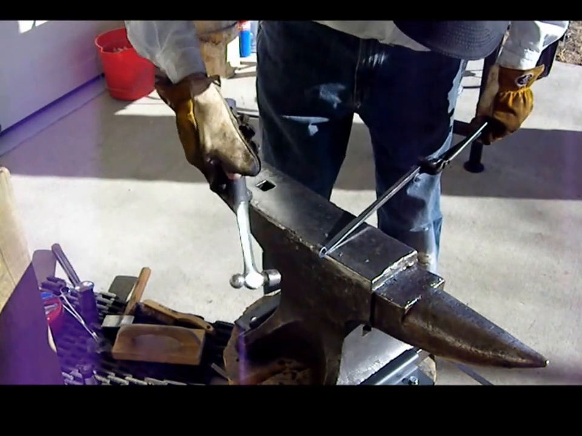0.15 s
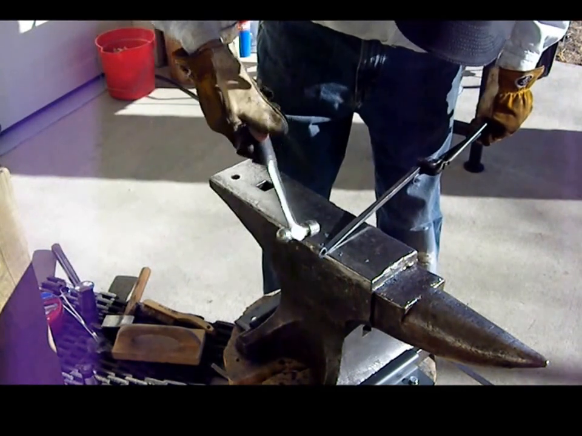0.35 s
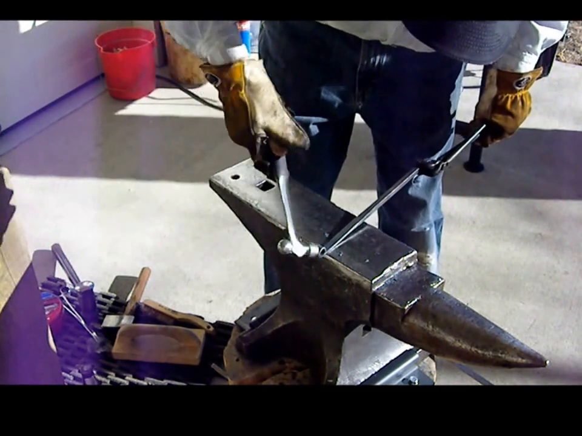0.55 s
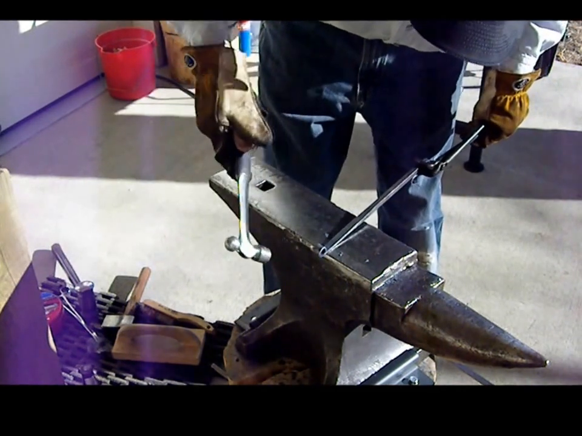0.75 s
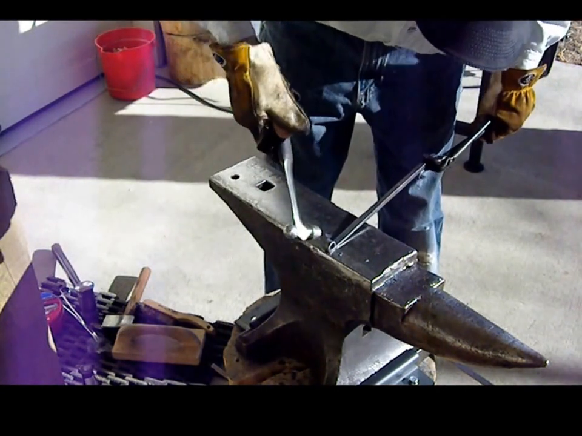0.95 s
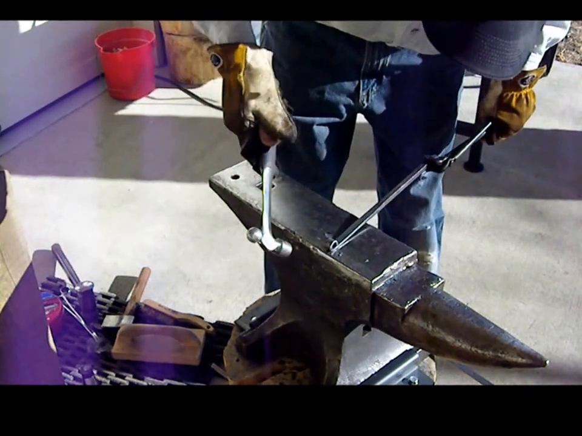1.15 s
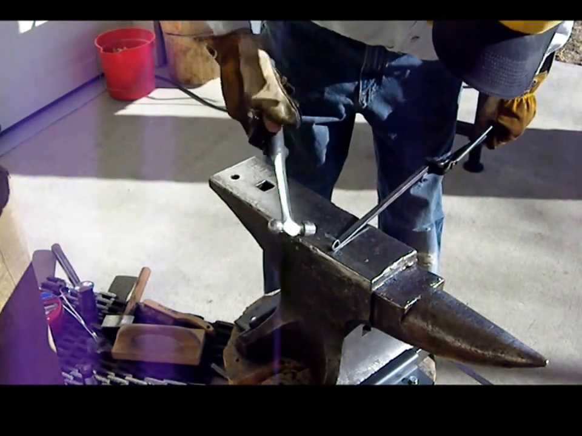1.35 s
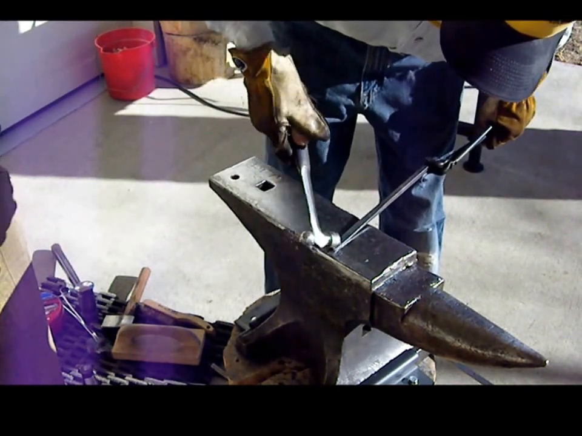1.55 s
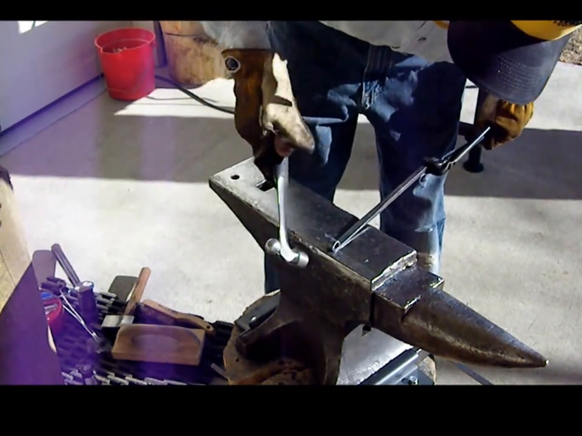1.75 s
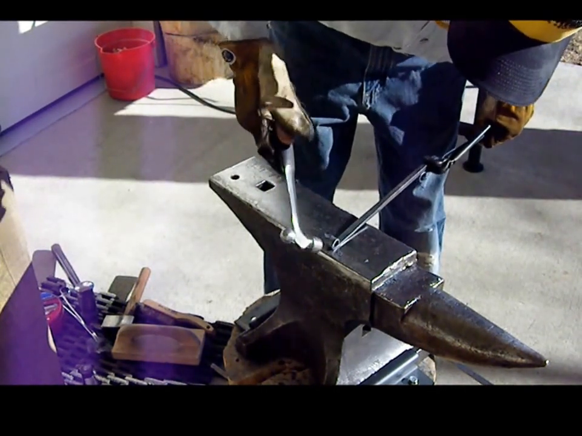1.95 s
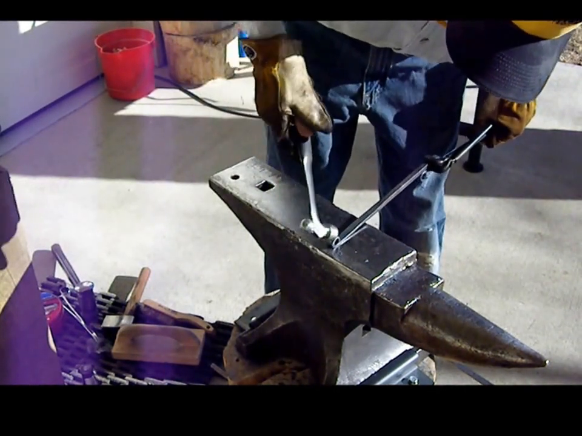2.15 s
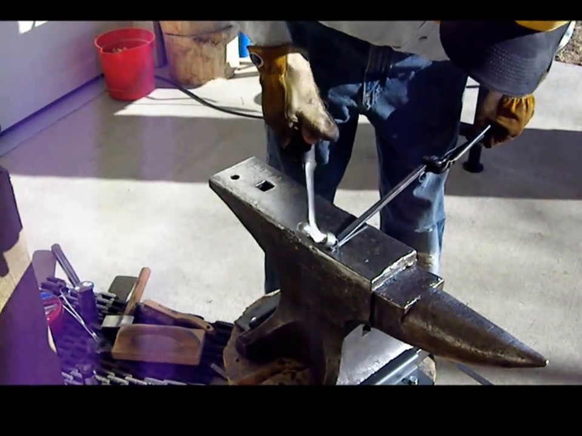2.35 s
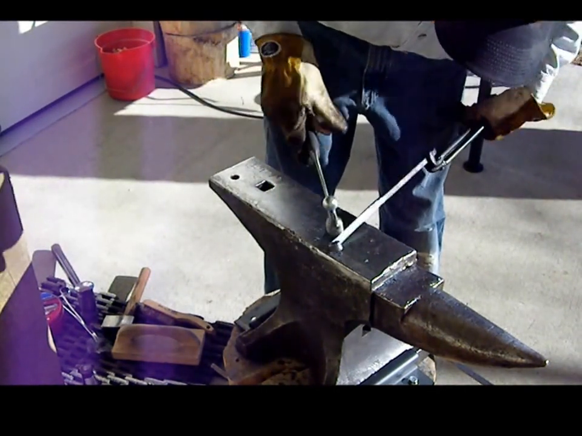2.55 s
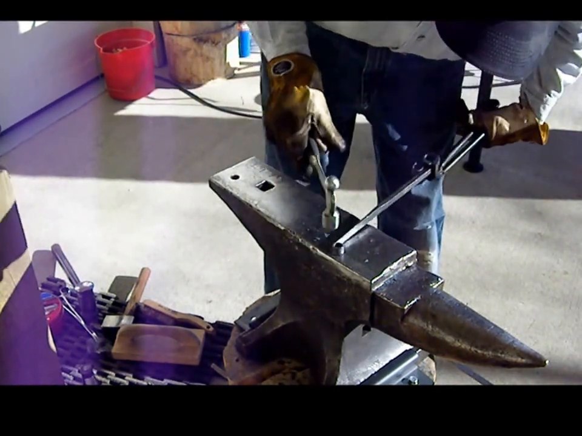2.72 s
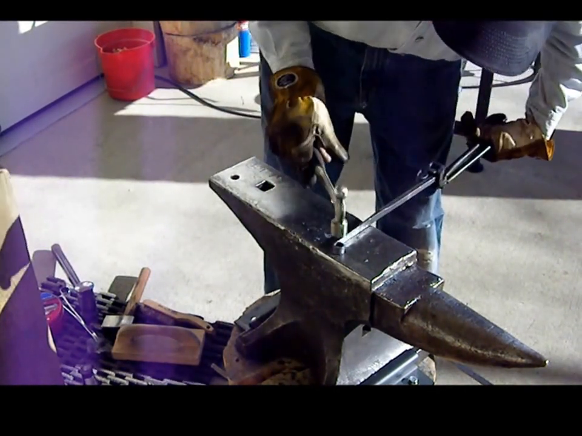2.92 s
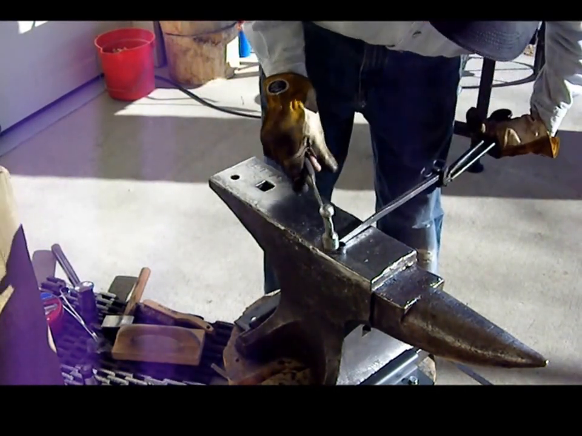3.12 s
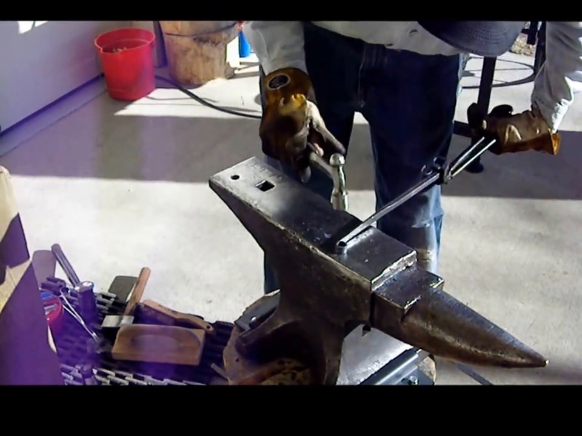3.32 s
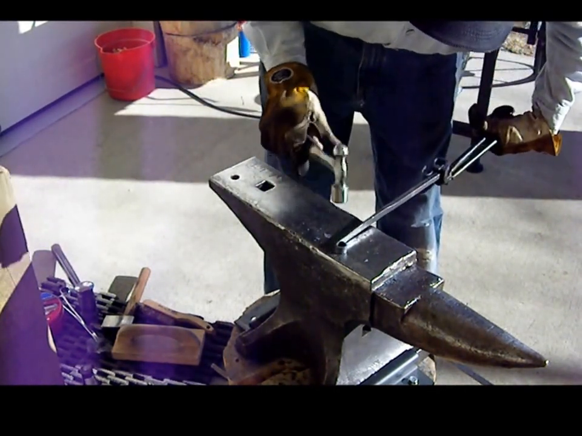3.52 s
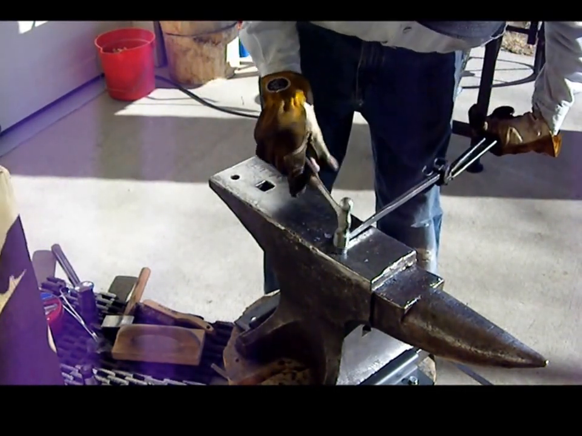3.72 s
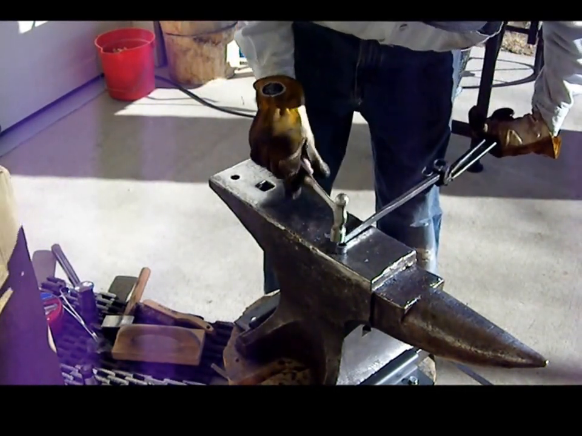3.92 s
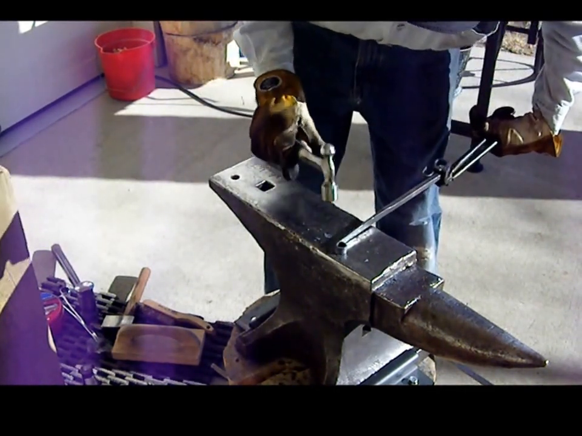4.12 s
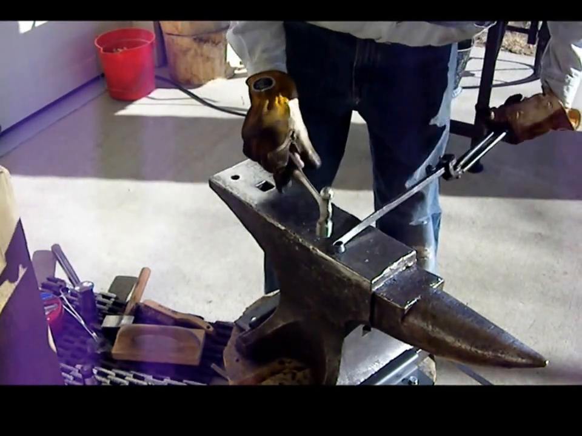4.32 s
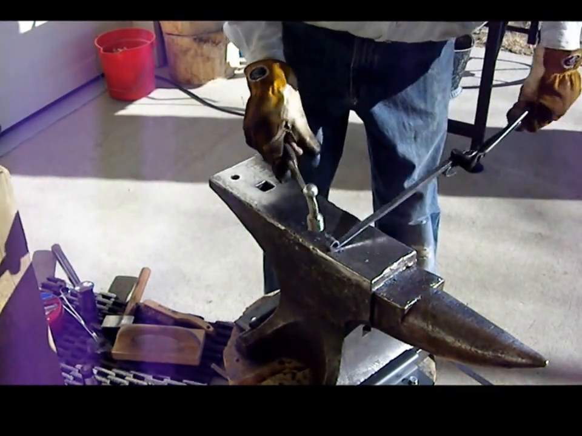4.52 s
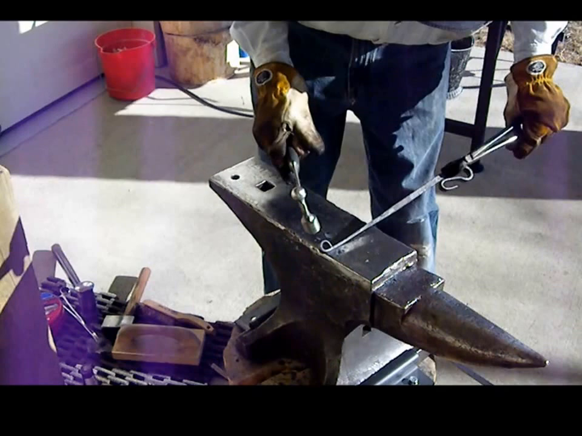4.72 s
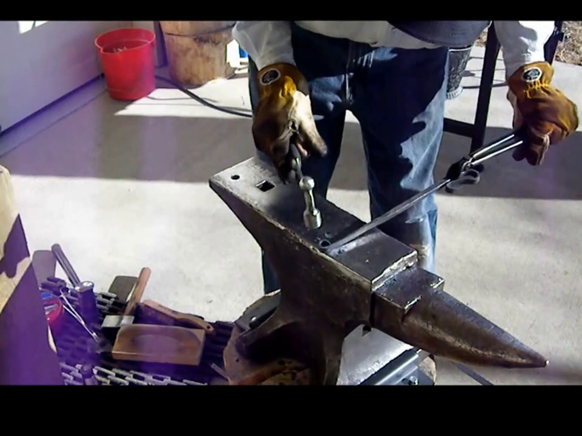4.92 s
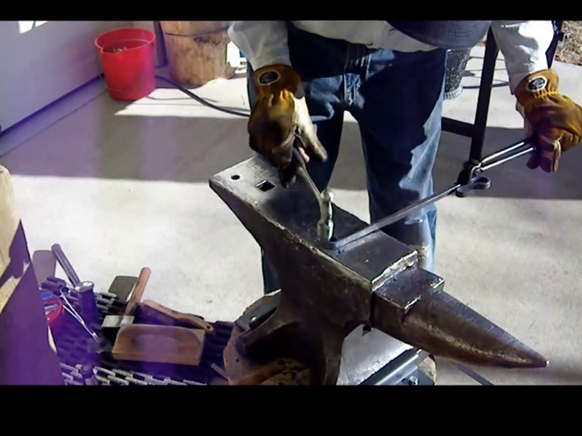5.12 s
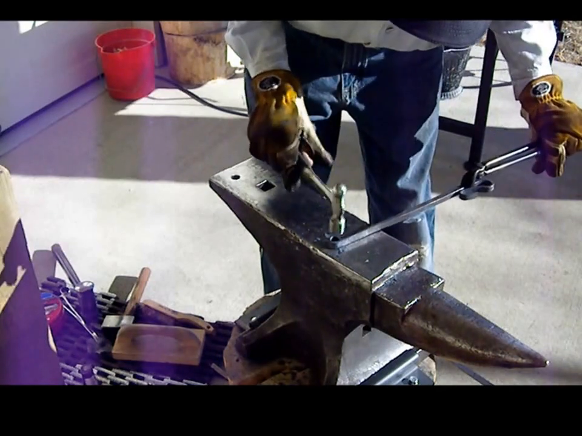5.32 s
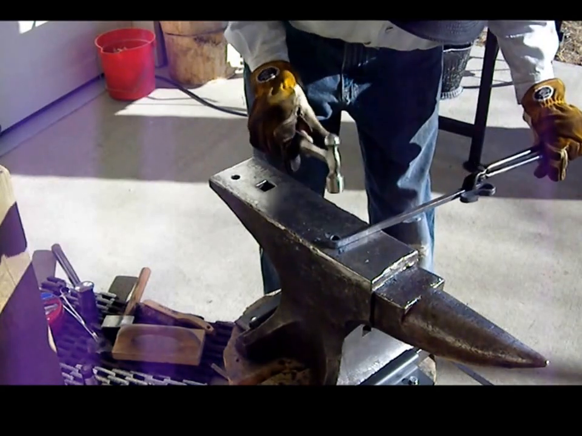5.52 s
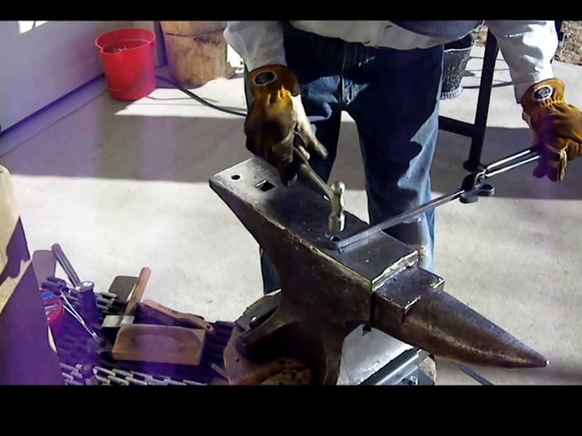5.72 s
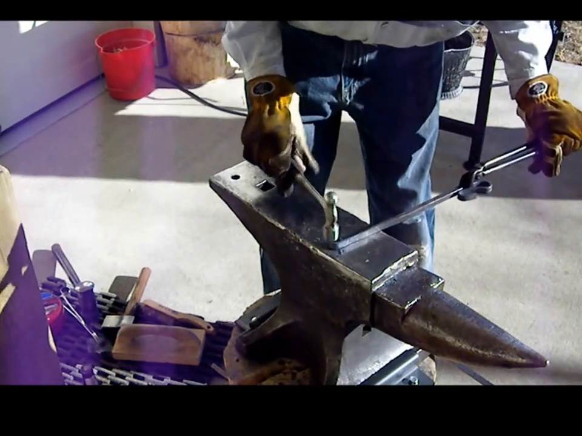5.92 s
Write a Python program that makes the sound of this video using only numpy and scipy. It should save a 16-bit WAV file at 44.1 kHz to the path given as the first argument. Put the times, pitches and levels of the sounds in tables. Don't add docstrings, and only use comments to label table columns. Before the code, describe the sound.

A hammer works a steel bar on an anvil under a porch, from about two metres. The tail of a blow opens it, then hard dry cracks fall about every 0.3 s from 0.25 to 2.4 s, with bright clang, slight low thud and short anvil ring. At 0.88 and 0.93 s a blow glances into a quick double hit, the bar ringing loosely and brightly. A gap follows, with a tong tick near 2.77 s. From 2.86 s a softer blow starts another run, to 4.2 s, with stronger, clearer ringing, high and sustained after the last blow. Faint ticks and scraping occur at 4.5-5.1 s with a very faint distant motor note. A light tap at 5.08 s leads to firm blows at 5.36, 5.65, with a tiny rebound, and 5.93 s, ringing to the end. Short porch reverberation; faint traffic hum and hiss throughout.

```python
import sys
import numpy as np
from scipy import signal
from scipy.fft import rfft, irfft
from scipy.io import wavfile
from scipy.ndimage import uniform_filter1d

SR = 44100
rng = np.random.default_rng(int(sys.argv[2]) if len(sys.argv) > 2 else 0)


def volts(x):
    e = np.asarray(x, float) / 20
    return 10 ** e


def wav_out(sig):
    wavfile.write(sys.argv[1], SR, np.round(np.clip(np.atleast_2d(sig).T, -1, 1) * 32767).astype(np.int16))


N = 267687
LEAD_S = .1
SLIP_S = .9333
REBOUND_S = .1
FIRM_RING_DB = -28

# t/s, crack peak level/dB, clang centre f/Hz, low ring level/dB, high ring level/dB
BLOWS = [(-.06, -1.5, 5660, -35.5, -49), (0.2494, -1, 5940, -34, -49), (0.5699, -2.5, 6700, -41, -46),
         (0.8847, -2.5, 5530, -26, -59.5), (SLIP_S, -2, 5750, -29.5, -28), (1.2334, -2, 5670, -29, -62),
         (1.532, -0.5, 6030, -28.5, -46), (1.82, -1.5, 6200, -35.5, -45), (2.1108, -1, 7160, -30, -56),
         (2.3764, 0, 7180, -35.5, -44), (2.8573, -4.5, 6700, -36, -60), (3.1228, 1, 5620, -20.5, -27),
         (3.3904, 1, 5480, -22, -21.5), (3.6591, -0.5, 5750, -20, -31), (3.9376, -1, 6050, -29, -42.5),
         (4.2153, 2, 5750, -20.5, -17), (5.0842, -10, 7150, -41.5, -48), (5.3609, -0.5, 6500, -28.5, -33.5),
         (5.6468, 1.5, 5830, -23, -33), (5.687, -15.5, 7260, -26.5, -30), (5.9268, 2, 6500, -22.5, -31)]
# f/Hz, level/dB
CRACK = [(290, -48.5), (500, -21), (667, -8), (850, -16), (1220, -16), (1900, -12.5), (3300, -14),
         (4900, -11), (5500, -6), (7500, -6.5), (8150, -15.5), (9400, -7), (12200, -15), (13900, -7.5),
         (15600, -17)]
# f/Hz, T60/s
PORCH_T60 = [(150, 0.19), (600, 0.48), (1800, 0.42), (4800, 0.32), (9000, 0.28), (14000, 0.23)]


def unit(x):
    return x / np.sqrt(np.mean(x ** 2))


def colour(x, points):
    hz, db = np.transpose(points)
    f = np.fft.rfftfreq(4096, 1 / SR)
    gain = volts(np.interp(np.log(f + 1), np.log(hz), db))
    cepstrum = irfft(np.log(gain))
    cepstrum[1:2048] *= 2
    cepstrum[2049:] = 0
    response = irfft(np.exp(rfft(cepstrum)))[:2048]
    return signal.fftconvolve(x, response)[:len(x)]


def reson(x, hz, width):
    return signal.lfilter(*signal.iirpeak(min(hz, .45 * SR), hz / width, SR), x)


def fade(t, t60):
    return np.exp(-np.log(1000) * t / t60)


def silence():
    return np.zeros(N + int(LEAD_S * SR))


def add(out, x, s):
    i = int(round((s + LEAD_S) * SR))
    out[i:i + len(x)] += x[:len(out) - i]


def modes(t, hz, db, t60, flutter_db):
    hz, db, t60 = (np.reshape(v, (-1, 1)) for v in (hz, db, t60))
    knots = rng.standard_normal((len(hz), 64))
    wobble = np.array([np.interp(t, np.arange(len(k)) * 0.0152, k) for k in knots])
    level = volts(db + flutter_db * wobble)
    return np.sum(level * fade(t, t60) * np.sin(2 * np.pi * hz * t), axis=0)


def contacts():
    s, peak_db, clang_hz, low_db, _ = np.transpose(BLOWS)
    rebound = np.diff(s, prepend=-1) < REBOUND_S
    top_db = -2 - 0.51 * (low_db - FIRM_RING_DB) - 7 * rebound
    thud_db = -25.5 - 0.84 * peak_db - 22 * rebound
    clang_db = -8.5 - 0.8 * peak_db + 3.5 * rebound
    return s, peak_db, top_db, thud_db, clang_hz, clang_db, rebound


def hammer():
    # f/Hz, bandwidth/Hz, level/dB
    stump_modes = [(195, 30, 1), (250, 35, 3), (330, 45, 1), (450, 70, -3), (660, 70, 1), (830, 120, -7)]
    out, low, t = silence(), silence(), np.arange(4096) / SR
    for s, peak_db, top_db, thud_db, clang_hz, clang_db, rebound in zip(*contacts()):
        grit = rng.standard_normal((3, len(t)))
        crack = colour(grit[0] * fade(t, 0.0081), CRACK)
        crack = crack + (volts(top_db) - 1) * reson(crack, 10000, 8300)
        clang_t60 = 0.042 if rebound else 0.021
        clang = reson(grit[1] * fade(t, clang_t60), clang_hz, 450)
        push = (1 + 0.31 * grit[2]) * fade(t, 0.0024)
        thud = np.zeros(len(t))
        for k, (hz, width, db) in enumerate(stump_modes):
            thud += (-1) ** k * volts(db) * reson(push, hz, width)
        crack_db = peak_db * (1 if rebound else .55)
        strike = crack / np.max(np.abs(crack)) + volts(clang_db) * clang / np.max(np.abs(clang))
        add(out, volts(crack_db) * strike, s)
        add(low, volts(peak_db + thud_db) * thud / np.max(np.abs(thud)), s)
    return out, low


def anvil():
    # level/dB, T60/s
    low_fades = [(2, 0.37), (-9, 1.06)]
    short_hz = [1997, 2276, 3302, 3706, 5600, 9655]
    short_t60 = [0.47, 0.46, 0.54, 0.34, 0.38, 0.3]
    short_firm_db = [-47, -56.5, -45.5, -44.5, -51, -54.5]
    short_per_ring = [0.93, 1.9, 0.93, 0.48, .3, 1.5]
    short_per_high = [-0.056, -0.04, 0.16, 0.19, -.1, .05]
    # f/Hz, level/dB, T60/s
    bar_modes = [(468, -38, .6), (1567, -30, .42), (1997, -23, .36), (3309, -28, .45), (5480, -27, .45),
                 (5610, -27, .42), (5960, -25, .42), (6250, -30, .38), (6584, -33, .35)]
    low_hz, high_hz = 1637, 4339.5
    out, t = silence(), np.arange(SR) / SR
    settle = volts(-6 * np.clip((t - 0.16) * 100, 0, 1))
    stops = np.append(contacts()[0][1:], N / SR + 1)
    for (s, _, _, low_db, high_db), stop in zip(BLOWS, stops):
        low = sum(volts(db) * fade(t, t60) for db, t60 in low_fades) * (1 - np.exp(-t / 0.028))
        ring = volts(low_db) * low * np.sin(2 * np.pi * low_hz * t)

        swell_s = 0.059 * volts(0.65 * (high_db - FIRM_RING_DB)) * (2.5 if s == SLIP_S else 1)
        high = fade(t, 0.87) * (1 - np.exp(-t / max(swell_s, .002)))
        ring += volts(high_db) * high * np.sin(2 * np.pi * high_hz * t)

        short_db = np.array(short_firm_db) + np.array(short_per_ring) * (low_db - FIRM_RING_DB)
        short_db += np.array(short_per_high) * (high_db - 1.15 * FIRM_RING_DB)
        at_blow_db = short_db + 60 * .075 / np.array(short_t60)
        short = modes(t, short_hz, at_blow_db, short_t60, flutter_db=5.0)
        ring += short * (1 - np.exp(-t / 0.01)) * settle
        choke = fade(np.clip(t - (stop - s), 0, None), 0.023)
        add(out, ring * choke, s)
    bar = modes(t, *np.transpose(bar_modes), flutter_db=3.5)
    add(out, bar * fade(np.clip(t - .3, 0, None), .03), SLIP_S)
    return out


def porch(x, tail_db):
    # t/s, level/dB
    reflections = [
        (.0022, -6),
        (.0052, -16),
        (.0105, -13),
        (.0118, -11),
        (.0131, -12),
        (.0147, -13),
        (.019, -16),
    ]
    t = np.arange(SR // 2) / SR
    hz, t60 = np.transpose(PORCH_T60)
    bands = 140 * 2 ** np.arange(0, 7, .5)
    near, diffuse = x
    noise, shape = [], []
    for f in bands:
        hiss = reson(rng.standard_normal(len(near) + len(t)), f, 0.21 * f)
        noise.append(np.sqrt(f) * unit(hiss))
        shape.append(fade(t, np.interp(np.log(f), np.log(hz), t60)))
    noise, shape = np.array(noise), np.array(shape) * (1 - np.exp(-t / 0.004))
    shape = volts(tail_db) * shape / np.sqrt(np.sum(bands[:, None] * shape ** 2))
    echoes = np.zeros(2048)
    echoes[0] = 1
    for s, db in reflections:
        echoes[int(s * SR)] += volts(db)
    out = signal.fftconvolve(near + diffuse, echoes)[:len(near)]
    cuts = np.append(np.round((contacts()[0] + LEAD_S) * SR).astype(int), len(near))
    for a, b in zip(cuts[:-1], cuts[1:]):
        answer = np.sum(shape * noise[:, a:a + len(t)], axis=0)
        add(out, signal.fftconvolve(diffuse[a:b], answer), a / SR - LEAD_S)
    return out


def rattle(level_db, cluster_db):
    cluster_hz = [5520, 5605, 5690, 5955, 6250, 6590, 7375]
    cluster_share_db = [0, 2, 0, -2, -5, -5, -6]
    times, peak_db, top_db, _, clang_hz, clang_db, _ = contacts()
    out = silence()
    start = np.round((times + LEAD_S) * SR).astype(int)
    room_hz, room_t60 = np.transpose(PORCH_T60)
    chatter = volts(unit(uniform_filter1d(rng.standard_normal(len(out)), size=90)))
    for f in 500 * 2 ** np.arange(0, 5.1, .25):
        peak = volts(clang_db + 11.5) / (1 + ((f - clang_hz) / 700) ** 2)
        band_db = peak_db + top_db * np.clip(np.log2(f / 6500), 0, 1)
        power = silence()
        power[start] = f * volts(2 * band_db) * (1 + peak ** 2)
        t60 = np.interp(np.log(f), np.log(room_hz), room_t60)
        power = signal.lfilter([1], [1, -fade(2 / SR, t60)], power)
        rise = 1 / (.009 * SR)
        power = signal.lfilter([rise], [1, rise - 1], power)
        noise = rng.standard_normal(len(power))
        band = unit(reson(reson(noise, f, 0.4 * f), f, 0.4 * f))
        out = out + np.sqrt(power) * chatter * band
    out = volts(level_db) * colour(out, CRACK)
    t = np.arange(SR // 2) / SR
    count = len(cluster_hz)
    for s, db in zip(times, peak_db + cluster_db):
        hz = np.array(cluster_hz) * (1 + .005 * rng.standard_normal(count))
        share_db = db + np.array(cluster_share_db) + 3 * rng.standard_normal(count)
        add(out, modes(t, hz, share_db, 0.31, flutter_db=4) * (1 - np.exp(-t / 0.0049)), s)
    return out


def yard():
    # f/Hz, level/dB
    yard_spectrum = [(18, -99), (30, -17), (241, -17), (275, -12), (377, -13), (518, -17), (1490, -24.5),
                     (4500, -28), (4870, -25), (15100, -31.5), (16400, -31)]
    # t/s, level/dB
    motor_levels = [
        (4.35, -75),
        (4.48, -61),
        (4.8, -59),
        (5.05, -62),
        (5.5, -63),
        (5.8, -75),
    ]
    t = np.arange(N) / SR
    swell = unit(uniform_filter1d(rng.standard_normal(N), SR // 4))
    hiss = unit(colour(rng.standard_normal(N), yard_spectrum)) * volts(-51.5 + 1.23 * swell)
    motor = unit(reson(rng.standard_normal(N), 275, 3))
    return hiss + motor * volts(np.interp(t, *np.transpose(motor_levels)))


def tongs():
    # t/s, duration/s, level/dB, centre f/Hz, grain rate/(1/s)
    slides = [
        (2.632, 0.02, -54.5, 9000, 900),
        (2.768, 0.022, -40, 7440, 1500),
        (3.015, 0.0057, -50, 13500, 900),
        (3.032, 0.0086, -55, 13500, 900),
        (3.628, 0.024, -47.5, 8000, 700),
        (4.54, .025, -60, 4500, 900),
        (4.607, 0.099, -58, 6700, 1500),
        (4.946, 0.19, -62, 6300, 1200),
    ]
    out = silence()
    t = np.arange(8192) / SR
    for s, length, db, hz, density in slides:
        chance = rng.random((2, len(t)))
        clicks = (chance[0] < density / SR) * (chance[1] - .5)
        grains = clicks * (t < length) * fade(t, 4 * length)
        body = .5 * reson(grains, hz, 0.41 * hz)
        body += 2.0 * reson(grains, 6800, 250) + 0.75 * reson(grains, 13100, 2500)
        add(out, volts(db) * body / np.sqrt(np.sum(body ** 2) / (length * SR) + 1e-12), s)
    return out


def scene():
    crack, thud = hammer()
    forge = porch((volts(4.0) * crack, thud + tongs()), tail_db=0.5)
    forge += rattle(level_db=-58.0, cluster_db=-29.5) + anvil()
    return (forge[-N:] + yard())[None]


def low_pass(x):
    return signal.sosfilt(signal.butter(12, 16540, fs=SR, output="sos"), x)


def record(dry):
    x = signal.sosfilt(signal.butter(2, 110, "highpass", fs=SR, output="sos"), dry)
    x = signal.lfilter(*signal.iirnotch(7880, 24, SR), x)
    x = signal.sosfilt(signal.ellip(10, .2, 50, 15650, fs=SR, output="sos"), x)
    x = np.clip(x, -.97, .97)
    return low_pass(x - 0.027 * x ** 2)


dry = scene()
out = record(dry)
wav_out(out)
```